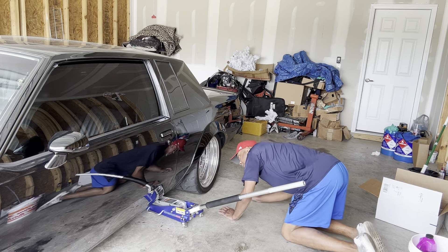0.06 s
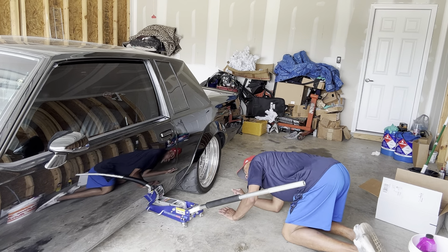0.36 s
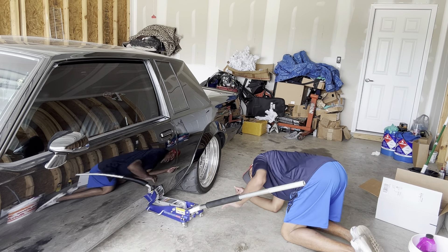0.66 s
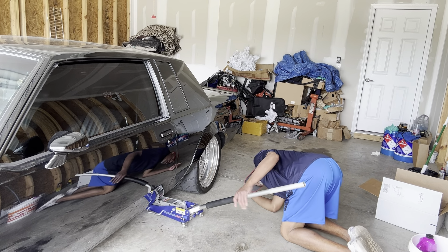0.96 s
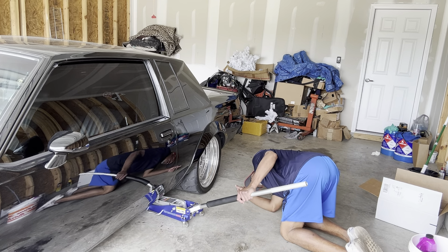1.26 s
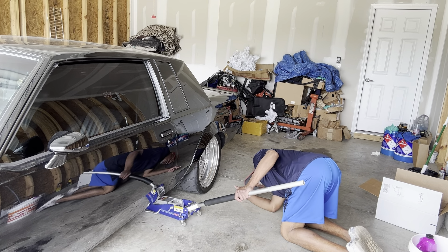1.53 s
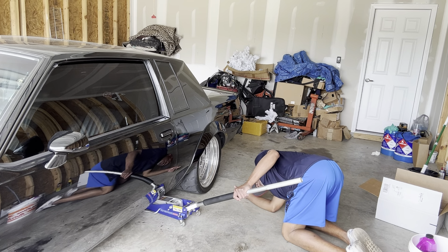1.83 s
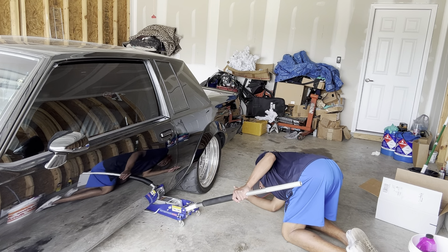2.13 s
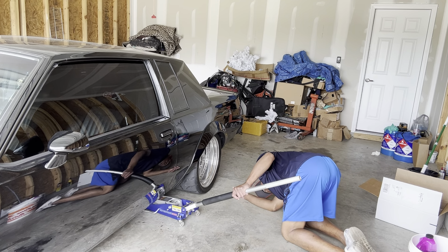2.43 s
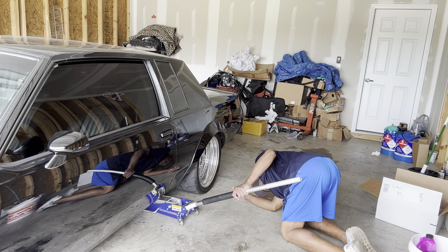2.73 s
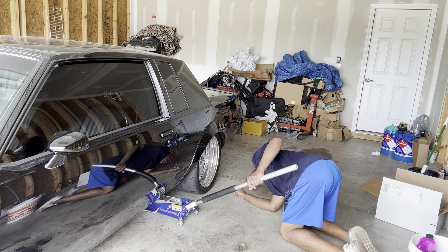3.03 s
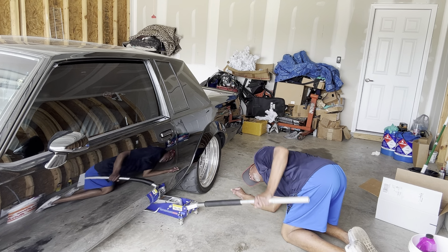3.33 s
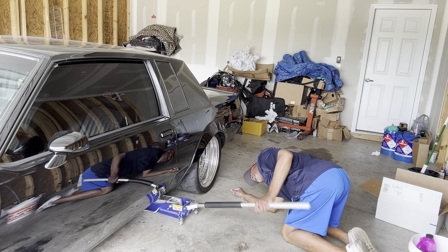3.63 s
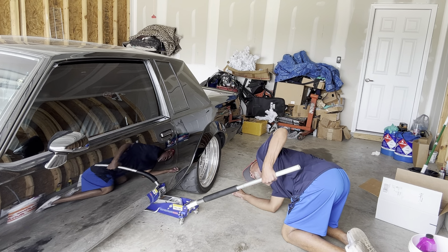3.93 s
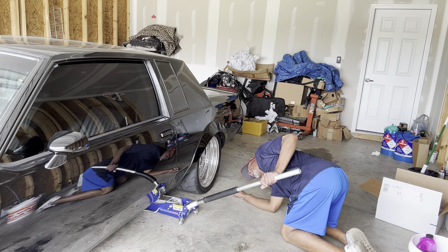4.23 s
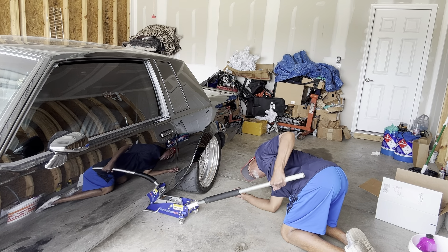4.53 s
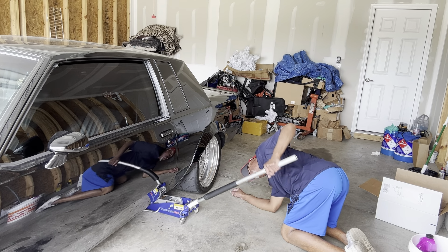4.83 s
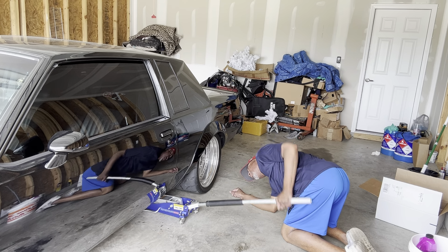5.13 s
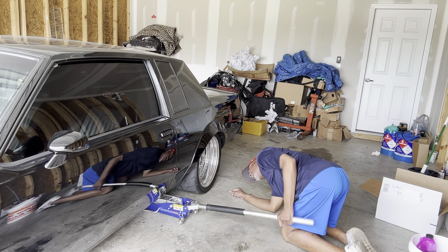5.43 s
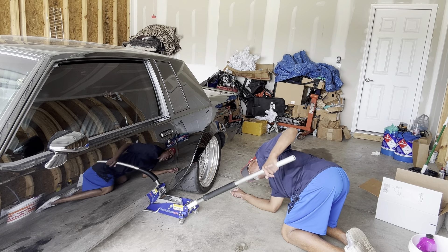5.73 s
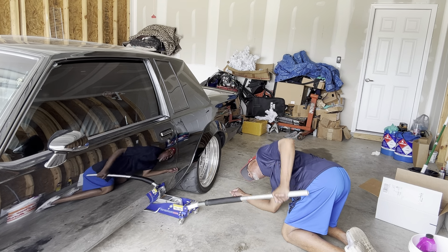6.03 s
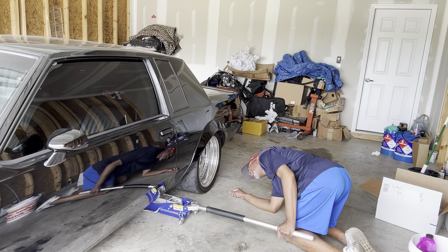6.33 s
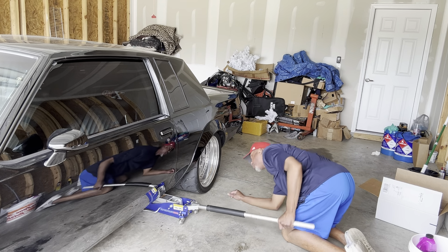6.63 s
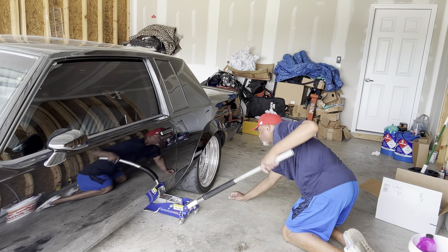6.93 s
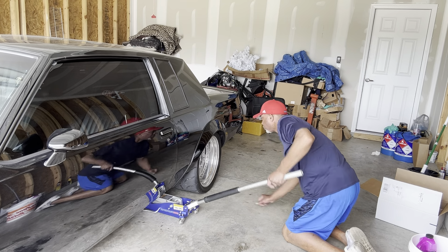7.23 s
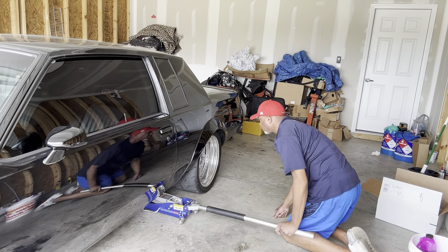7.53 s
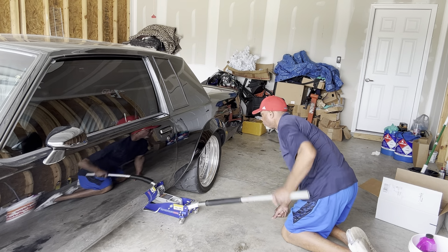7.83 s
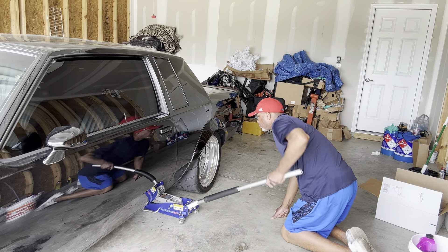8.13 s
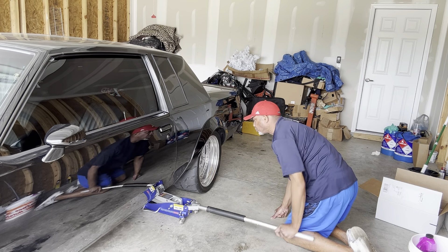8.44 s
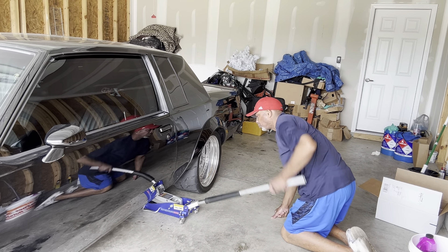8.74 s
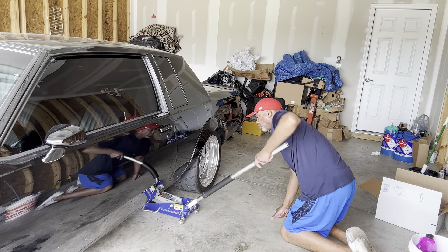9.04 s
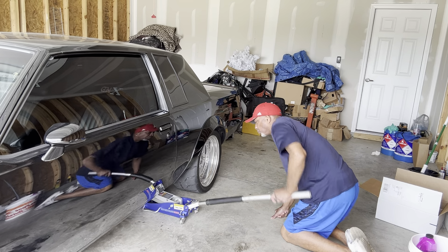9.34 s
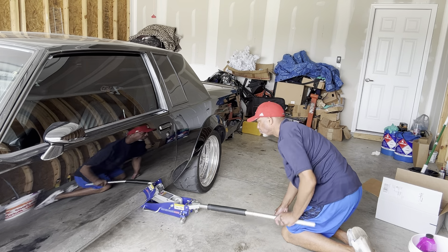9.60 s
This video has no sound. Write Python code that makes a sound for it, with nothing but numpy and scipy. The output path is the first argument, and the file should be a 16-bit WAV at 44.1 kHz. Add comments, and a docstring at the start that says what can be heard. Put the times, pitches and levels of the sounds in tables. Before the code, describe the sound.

Soft cloth swishes and light metallic clicks start off as someone works the handle of a floor jack. The uneven knocks grow louder, each with a short steel ring, joined by faint rattling and dull rubbing. Near the end, two high squeaks ring out about a second apart, followed by more knocks. The garage adds a short echo and a faint steady hum.

```python
"""Soft swishes and the clicks of a loose steel handle: a floor jack is pumped under a car in a garage.
The handle knocks in its socket and the linkage rattles, both setting the steel ringing. Late on, a dry
pivot sticks and slips on two downstrokes, squealing up into the ringing pitch of the handle tube.
Cloth and sliding parts swish, the loaded jack rubs, and a low rumble and faint hum lie underneath."""
import sys
import numpy as np
from scipy import signal
from scipy.fft import rfft, irfft, next_fast_len
from scipy.io import wavfile

SR = 44100
rng = np.random.default_rng(int(sys.argv[2]) if len(sys.argv) > 2 else 0)


def materialize(psi):
    """Save the field psi as 16-bit PCM at rate SR to the path in sys.argv[1].

    A 1-D psi becomes a single channel; in a 2-D psi each row is a channel.
    """
    bounded = np.clip(np.atleast_2d(psi).T, -1, 1)
    quanta = np.round(bounded * 32767).astype(np.int16)
    wavfile.write(sys.argv[1], SR, quanta)


N = 435266
T = np.arange(N) / SR


# single knocks of the handle in its socket: start_s, level_db, treble_db, resonance_hz
HANDLE_KNOCKS = [(1.197, -43, -6, 780), (1.27, -46, -5, 5740), (1.3396, -40, -6.5, 5970),
                 (1.4282, -42.5, -3, 2770), (1.859, -49.5, -12, 2350), (2.001, -44.5, -6, 2540),
                 (2.4502, -49, -3.5, 2220), (2.5072, -45, -1, 2330), (2.808, -43.5, 8.5, 2700),
                 (2.811, -61.5, 27.5, 12300), (3.0225, -38.5, -12, 2580), (3.5984, -41.5, -11.5, 1620),
                 (3.6905, -36.5, -0.5, 9150), (3.8915, -33, 6, 4900), (3.9002, -28.5, -30, 2540),
                 (4.01, -39.5, -5, 1180), (4.048, -43.5, -9, 2560), (4.4571, -36, -4, 1360),
                 (4.4714, -34, -4.5, 1270), (4.5313, -43.5, 0, 4530), (5.0385, -39.5, -10.5, 3900),
                 (5.075, -38, -7, 1990), (5.943, -30.5, -5.5, 8360), (6.089, -41.5, -1, 3970),
                 (6.7675, -48, -14, 1950), (7.0357, -40, -8, 1750), (7.088, -31.5, -0.5, 5050),
                 (7.1623, -29, -15, 2200), (7.7018, -33.5, -4.5, 1920), (8.059, -41.5, -2.5, 5680),
                 (8.081, -32.5, 2.5, 3460), (8.117, -22.5, -13, 1940), (8.8996, -28, -11, 2170),
                 (8.992, -24.5, -25, 2060)]
# hits at the turn of a stroke: start_s, level_db, treble_db, resonance_hz, rebound_gain_db
TURN_HITS = [(1.068, -47, -8, 800, 4), (5.4308, -37, -8.5, 1910, -2.5), (5.8823, -36, -11, 650, 6),
             (6.265, -31, -22.5, 1120, 1), (8.5509, -34.5, -2, 1930, 2.5), (9.6404, -37, -8, 2300, 0.5)]
# base EQ of a knock: freq_hz, gain_db
KNOCK_EQ = [(100, 0), (350, 10), (700, 5.5), (1200, 5), (1900, 1.5), (2700, 4.5), (3600, 0), (5500, 0),
            (7800, 8), (10300, -10), (13300, 2.5), (16000, -24)]

def handle_knocks(chatter_s=0.0048, tail_s=0.021, attack_s=0.0023, rebound_s=0.025, ring_db=-11,
                  resonance_db=7, width_octaves=0.13, ripple_db=3, likeness=0.48, right_lag_s=0.00003):
    """Each knock is a quick chatter of steel on steel; where it lands decides which resonance speaks."""
    blows = list(HANDLE_KNOCKS)
    for start, db, treble_db, resonance_hz, rebound_db in TURN_HITS:
        blows.append((start, db, treble_db, resonance_hz))
        blows.append((start + rebound_s, db + rebound_db, treble_db, resonance_hz))
    size = 2 ** 13
    t, hz = np.arange(size) / SR, np.fft.rfftfreq(size, 1 / SR)
    ripple_hz = np.geomspace(300, 16000, 70)
    envelope = (np.exp(-t / chatter_s) + amp(-15) * np.exp(-t / tail_s)) * (1 - np.exp(-t / attack_s))
    hits, drive = np.zeros((2, 2, N))
    for start, db, treble_db, resonance_hz in blows:
        left, other = rfft(rng.standard_normal((2, size)))
        right = blend(left, other, likeness) * np.exp(-2j * np.pi * hz * right_lag_s)
        resonance = 1 / (1 + (np.log2((hz + 1) / resonance_hz) / width_octaves) ** 2)
        # low-pitched blows have more body and a darker top; hard ones are a little leaner
        body_db = -5 - 2 * np.log2(resonance_hz / 1800) - 0.1 * (db + 32)
        knee_hz = np.clip(1.05 * resonance_hz, 1800, 3200)
        shelves = [(550, body_db), (1000, 0), (knee_hz, 0), (6500, treble_db - 7.5)]
        eq_db = curve_at(KNOCK_EQ, hz) + curve_at(shelves, hz) + resonance_db * resonance
        eq_db += ripple_db * np.interp(hz, ripple_hz, rng.standard_normal(len(ripple_hz)))
        spectrum = 3 * np.array([left, right]) * amp(db - 2 + eq_db)
        add(hits, start, irfft(spectrum) * envelope)
        add(drive, start, irfft(spectrum * (1 / 20 + resonance)) * envelope)
    return hits + amp(ring_db) * steel_ring(drive)


# modes of the jack's steel: pitch_hz, level_db, t60_s
STEEL_MODES = [(962, -18, 0.087), (1284, -53, 0.26), (1530, -52.5, 0.2), (1700, -34, 0.12),
               (2257, -44.5, 0.14), (2580, -30, 0.067), (3720, -33, 0.19), (4470, -29.5, 0.44),
               (7200, -15.5, 0.22), (8800, -24, 0.27)]

def steel_ring(drive):
    """The jack's modes ring on after whatever strikes them."""
    t = np.arange(SR) / SR
    ring = sum(amp(db - 60 * t / t60) * np.sin(2 * np.pi * (hz * t + rng.random((2, 1))))
               for hz, db, t60 in STEEL_MODES)
    return signal.oaconvolve(drive, ring, axes=1)[:, :N]


# squeals of the pivot (hold_s and mid_rise_s count from the start): start_s, attack_s, hold_s,
# length_s, level_db, brightness_db, roughness, first_pitch_hz, top_pitch_hz, mid_rise_s
PIVOT_SQUEALS = [(7.272, 0.031, 0.15, 0.22, -20, 2, 0.42, 1788, 1998, 0.085),
                 (8.075, 0.017, .04, 0.035, -15.5, -13.5, 0.2, 1775, 1806, 0.08),
                 (8.202, .014, 0.17, 0.29, -17.5, -5, 0.03, 1759, 2017, .076)]

def dry_pivot(level_db=1, tube_hz=(1988, 2000), ring_t60_s=1.9, ring_db=-19):
    """The pivot squeals; near the top of a rise it sets two close modes of the handle tube singing."""
    squeals = np.zeros(N)
    for start, *shape in PIVOT_SQUEALS:
        add(squeals, start, squeal(*shape))
    decay = np.exp(-np.log(1000) / (ring_t60_s * SR))
    poles = [decay * np.exp(2j * np.pi * hz / SR) for hz in tube_hz]
    tube = sum(2 * signal.lfilter([1 - decay], [1, -pole], squeals + 1e-12).real for pole in poles)
    return amp(level_db) * (squeals + amp(ring_db) * tube)


# harmonics of a squeal: pitch_ratio, level_db
SQUEAL_OVERTONES = [(2, -13), (3, -19), (4, -14), (5, -31), (6, -30.5), (7, -27.5)]
# partials between the harmonics: pitch_ratio, level_db
SQUEAL_HALF_ORDERS = [(1.5, -25), (2.5, -30.5), (3.5, -34), (4.5, -32)]
# EQ of the squeal's overtones, with a peak near 3.9 kHz and a dip near 10 kHz: freq_hz, gain_db
OVERTONE_EQ = [(3550, 3.5), (3880, 11), (4060, 2.5), (5000, -6.5), (5700, 4.5), (6900, -13.5), (9300, 5.5),
               (10200, -20), (11500, -3.5)]

def squeal(attack_s, hold_s, length_s, db, bright_db, roughness, first_hz, top_hz, mid_rise_s,
           rise_s=0.01865, fade_db_per_s=164, dull_db_per_s=57, dip_db=-7.5, flicker_db=3,
           waver=0.0057, jitter=0.0071, flutter=0.33, quarters_db=-9, grit_db=-13):
    """Stick and slip makes a wavering tone; as it rises, uneven slips repeat every two or four cycles."""
    t = np.arange(0, length_s, 1 / SR)

    def wobble(rate_hz):
        """Random modulation for the length of the squeal."""
        return wander(SR // 2, rate_hz)[:len(t)]

    risen = 1 / (1 + np.exp((mid_rise_s - t) / rise_s))
    hz = first_hz + (top_hz - first_hz) * risen
    fading_s = np.maximum(t - hold_s, 0)
    envelope = np.minimum(t / attack_s, 1) * amp(db - fade_db_per_s * fading_s)
    detune = 1 + waver * wobble(45) + jitter * roughness * wobble(260)
    phase = 2 * np.pi * np.cumsum(hz * detune) / SR
    overtones = sum(amp(gain_db + curve_at(OVERTONE_EQ, k * hz) + flicker_db * wobble(70))
                    * np.sin(k * phase) for k, gain_db in SQUEAL_OVERTONES)
    halves = sum(amp(gain_db + flicker_db * wobble(70)) * np.sin(k * phase)
                 for k, gain_db in SQUEAL_HALF_ORDERS)
    quarters = sum(np.sin(k * phase) / k for k in (0.75, 2.25, 2.75, 3.25))
    # halfway up, the slip is at its sharpest and the fundamental gives way
    tone = amp(dip_db * np.sin(np.pi * risen) + flicker_db * wobble(35)) * np.sin(phase)
    tone += amp(bright_db - dull_db_per_s * fading_s) * overtones
    tone += risen * (amp(bright_db) * halves + amp(quarters_db) * roughness * quarters)
    grit_band = signal.butter(4, [400, 8000], "band", fs=SR, output="sos")
    grit = unit(signal.sosfilt(grit_band, rng.standard_normal(SR)))[:len(t)] * (1 + np.sin(phase))
    sound = tone * (1 + flutter * roughness * wobble(260)) + amp(grit_db) * roughness * grit
    return envelope * sound * signal.windows.tukey(len(t), 0.1)


# loose play in the linkage as the handle swings: start_s, length_s, level_db
LINKAGE_RATTLES = [(1.05, 0.66, -65.5), (1.82, 0.57, -73), (2.42, 0.12, -66.5), (3.5, 0.28, -64.5),
                   (3.95, 0.57, -65), (4.65, 0.28, -64), (9.3, 0.53, -68)]

def linkage_rattle(ticks_per_s=70, parts=12, tick_s=0.005, spread_db=5, level_db=13, ring_db=-25):
    """Pins and links tick at random, each at its own pitch, and set the steel ringing."""
    t, ticks = np.arange(SR // 20) / SR, np.zeros(N)
    for hz in np.geomspace(950, 3500, parts):
        tick = signal.lfilter(*signal.iirpeak(hz, 4, fs=SR), rng.standard_normal(len(t)))
        tick *= np.exp(-t / tick_s)
        triggers = rng.random(N) < ticks_per_s / parts / SR
        strength = amp(spread_db * np.clip(rng.standard_normal(N), -2, 1))
        ticks += signal.oaconvolve(triggers * strength, tick / abs(tick).max())[:N]
    ticks *= amp(level_db) * swells(LINKAGE_RATTLES)
    return ticks + amp(ring_db) * steel_ring(ticks[None])


# swishes of cloth and sliding parts: start_s, length_s, level_db
SWISH_STROKES = [(.06, 0.26, -64.5), (.48, 0.21, -71), (.91, 0.13, -66), (1.97, 0.24, -70),
                 (2.73, 0.13, -65), (2.83, 0.18, -59), (3.68, 0.31, -58.5), (4.26, 0.16, -62.5),
                 (4.99, 0.027, -58.5), (5.47, 0.064, -67), (6.2, 0.17, -64.5), (6.59, 0.14, -70),
                 (6.86, 0.14, -64.5), (8.95, 0.064, -53.5), (9.17, 0.23, -72)]
# EQ of a swish: freq_hz, gain_db
SWISH_EQ = [(400, 2.5), (1500, 5.5), (2700, 5), (4000, 5.5), (6300, 6), (7500, 11.5), (9200, 9),
            (10300, -24), (11500, 5), (13900, 7), (15000, -13), (16000, -42)]

def swishes(level_db=3, grain_db=3.5, grain_hz=140):
    """Light friction of cloth and sliding parts: bright, grainy noise."""
    return stereo_noise(SWISH_EQ) * swells(SWISH_STROKES) * amp(level_db + grain_db * wander(N, grain_hz))


# rubs of the jack under load: start_s, length_s, level_db
RUB_STROKES = [(3.95, 0.61, -62), (5.97, 0.53, -55.5), (7.25, 0.51, -53.5), (8.15, 0.29, -49),
               (8.65, 0.18, -61.5), (9.05, 0.7, -53.5)]
# EQ of a rub: freq_hz, gain_db
RUB_EQ = [(100, -4.5), (250, 7), (400, 1), (750, -2.5), (1200, -4), (2200, -20), (5000, -20.5),
          (12000, -44.5)]

def jack_rub(level_db=2, grain_db=2.5, grain_hz=54):
    """Friction in the loaded jack: dull noise with a coarser grain."""
    return stereo_noise(RUB_EQ) * swells(RUB_STROKES) * amp(level_db + grain_db * wander(N, grain_hz))


# rumble of the garage air: freq_hz, gain_db
AIR_EQ = [(15, -22), (30, -11.5), (59, 2.5), (95, 2.5), (174, -10), (457, -23.5), (800, -28.5),
          (1420, -35.5), (2620, -38), (4200, -47), (8000, -47.5), (10300, -68), (13500, -52.5),
          (16000, -79.5)]
# tones of the hum: pitch_hz, level_db
HUM_TONES = [(59.5, -57), (157.5, -59.5), (227, -71.5)]
# fader ride on the hum: time_s, gain_db
HUM_RIDE = [(1.2, -2.5), (2.7, 7.5), (5.9, 7), (6.6, 0), (9.5, 7.5)]

def room_tone(air_db=-44.5, drift_hz=1.507, waver_db=2):
    """Low rumble and a wavering hum, the hum a little louder on the left than on the right."""
    hum = np.zeros(N)
    for hz, db in HUM_TONES:
        level = amp(db + waver_db * wander(N, 0.97))
        pitch_hz = hz + drift_hz * wander(N, 3.65)
        hum += level * np.sin(2 * np.pi * np.cumsum(pitch_hz) / SR)
    hum *= np.sqrt(2) * amp(np.interp(T, *np.transpose(HUM_RIDE)))
    return amp(air_db) * stereo_noise(AIR_EQ) + hum * amp([[0.8], [-0.8]])


# reverb time of the garage: freq_hz, t60_s
GARAGE_DECAY = [(200, 0.8), (700, 0.49), (1800, 0.53), (4500, 0.36), (8000, 0.32), (14000, 0.23)]

def garage(x, wet_db, build_s=0.0014, echoes_per_s=4000):
    """Direct sound plus dense reflections, each band dying at its own speed."""
    echoes = rng.choice([-1., 1.], (2, SR)) * (rng.random((2, SR)) < echoes_per_s / SR)
    hz, t, bands = signal.stft(echoes, SR, nperseg=256)
    bands = bands * amp(-60 * t / curve_at(GARAGE_DECAY, hz)[:, None])
    tail = signal.istft(bands * (1 - np.exp(-t / build_s)), SR, nperseg=256)[1]
    tail /= np.linalg.norm(tail, axis=1, keepdims=True)
    return x + amp(wet_db) * signal.oaconvolve(x, tail, axes=1)[:, :N]


# left-right likeness of the noise layers: freq_hz, correlation
STEREO_LIKENESS = [(60, 0.92), (160, 0.77), (320, 0.8), (700, 0.0031), (1500, 0.23), (4000, 0.035),
                   (12000, 1)]

def stereo_noise(eq):
    """Shaped noise, wide in the mids and centred in the bass and at the very top."""
    size = next_fast_len(N, True)
    hz = np.fft.rfftfreq(size, 1 / SR)
    left, other = rfft(rng.standard_normal((2, size)))
    right = blend(left, other, curve_at(STEREO_LIKENESS, hz))
    return unit(irfft(np.array([left, right]) * amp(curve_at(eq, hz)), size)[:, :N])


def blend(source, other, likeness):
    """Equal-power mix of two noises, correlated with the first by likeness."""
    return likeness * source + np.sqrt(1 - likeness ** 2) * other


def swells(rows):
    """An envelope in which each stroke swells and fades as one arch."""
    return sum(amp(db) * np.sin(np.pi * np.clip((T - start) / length, 0, 1)) for start, length, db in rows)


def wander(size, rate_hz):
    """Smooth random modulation of rms 1, moving at about the given rate."""
    hz = np.fft.rfftfreq(size, 1 / SR)
    return unit(irfft(rfft(rng.standard_normal(size)) / (1 + (hz / rate_hz) ** 4), size))


def curve_at(points, hz):
    """Reads a curve on a log-frequency axis."""
    point_hz, value = np.transpose(points)
    return np.interp(np.log(hz + 1), np.log(point_hz + 1), value)


def amp(db):
    """Decibels to gain."""
    return 10 ** (np.asarray(db) / 20)


def unit(x):
    """Scales to rms 1."""
    return x / np.sqrt(np.mean(x ** 2) + 1e-20)


def add(mix, start_s, sound):
    """Mixes a sound in at a time."""
    part = mix[..., round(start_s * SR):][..., :sound.shape[-1]]
    part += sound[..., :part.shape[-1]]


def scene(lag_radians=0.9):
    """The jack in the garage; the squeal is louder on the right and lags there in phase."""
    analytic = signal.hilbert(dry_pivot(), next_fast_len(N))[:N]
    pivot_pair = (analytic * np.exp(-1j * np.array([[0], [lag_radians]]))).real
    squeals = garage(pivot_pair, wet_db=-4.5) * amp([[-1.5], [1.2]])
    clatter = garage(handle_knocks() + linkage_rattle(), wet_db=-3.5)
    friction = garage(swishes() + jack_rub(), wet_db=0)
    return squeals + clatter + friction + room_tone()


def record(dry, cutoff_hz=16000):
    """A steep low-pass on the whole mix."""
    lowpass = signal.firwin(511, cutoff_hz, window=("kaiser", 9), fs=SR)
    return signal.oaconvolve(dry, lowpass[None], "same", axes=1)


dry = scene()
out = record(dry)
materialize(out)
```